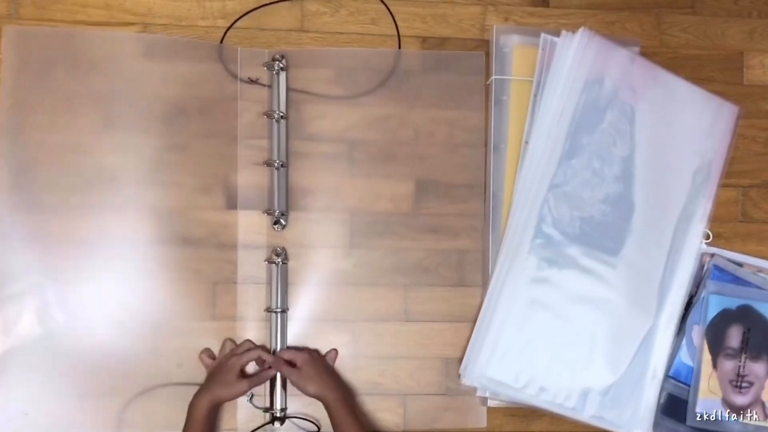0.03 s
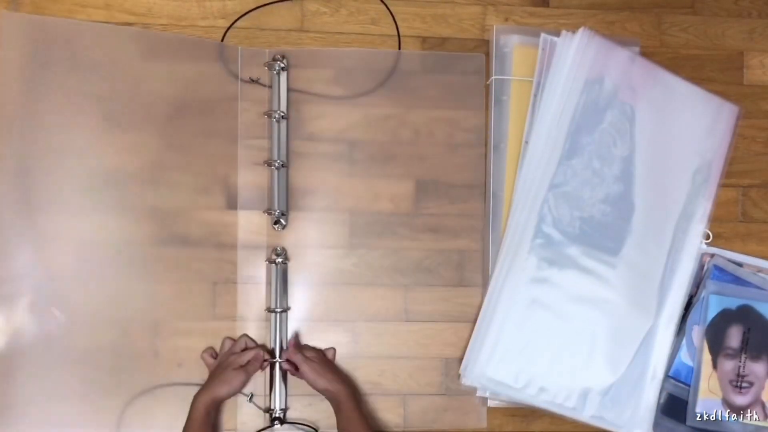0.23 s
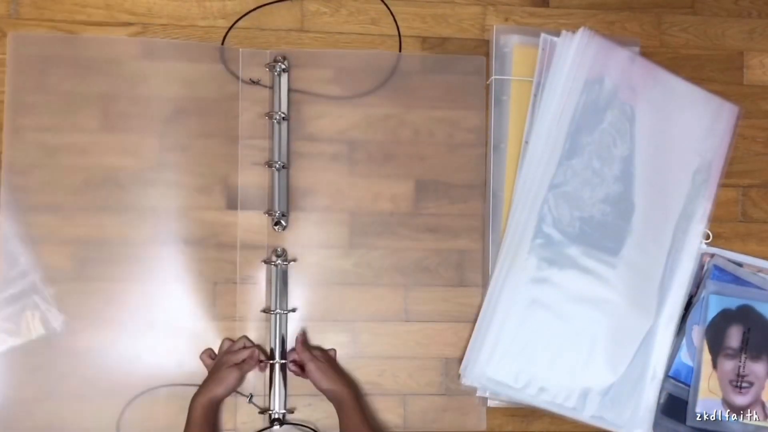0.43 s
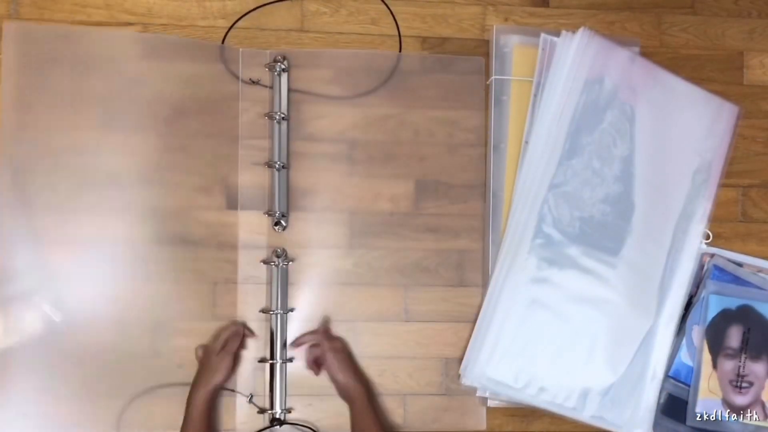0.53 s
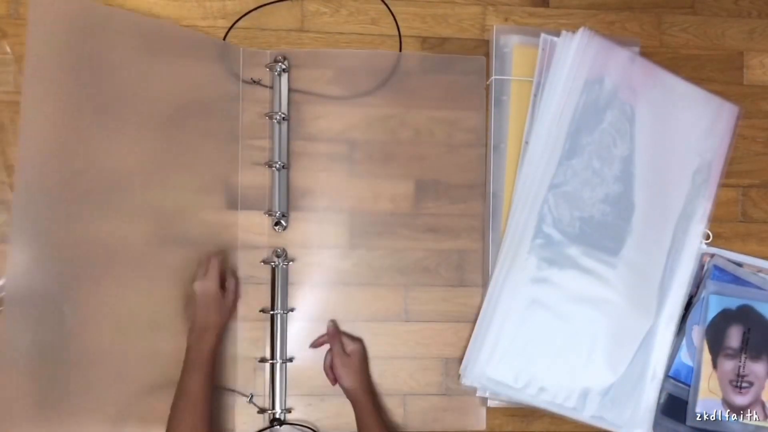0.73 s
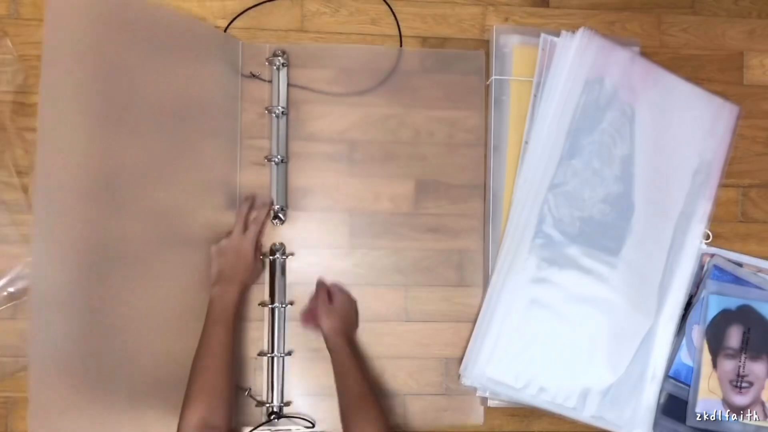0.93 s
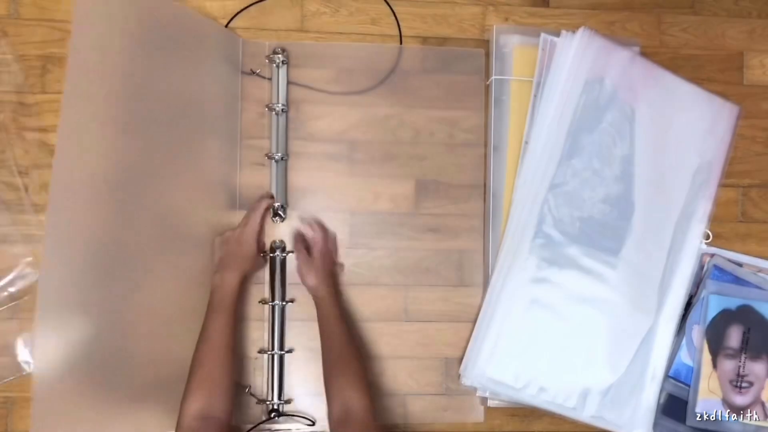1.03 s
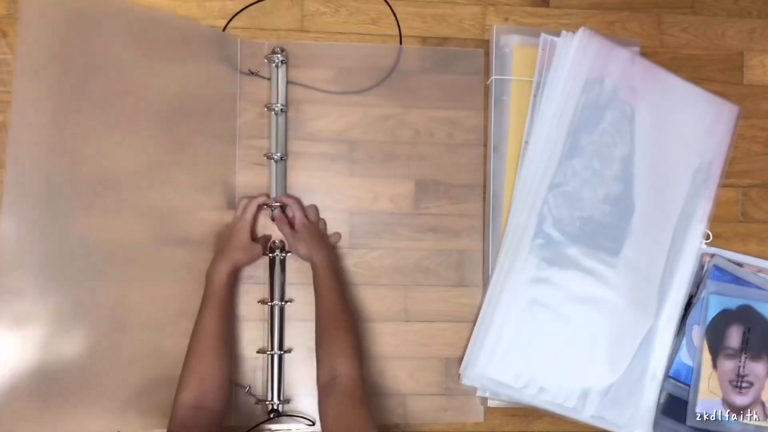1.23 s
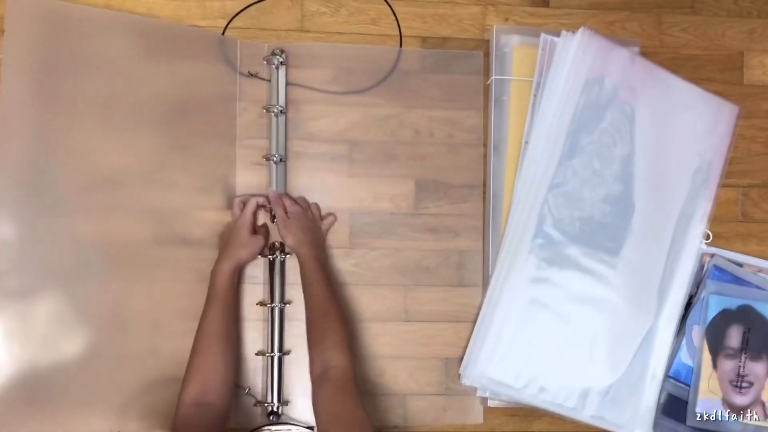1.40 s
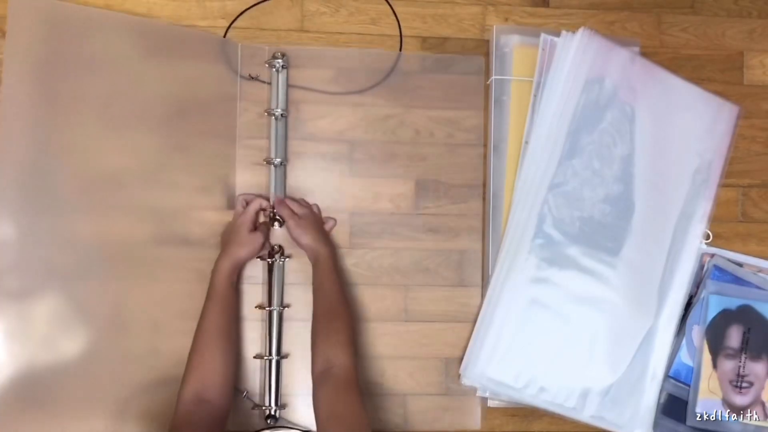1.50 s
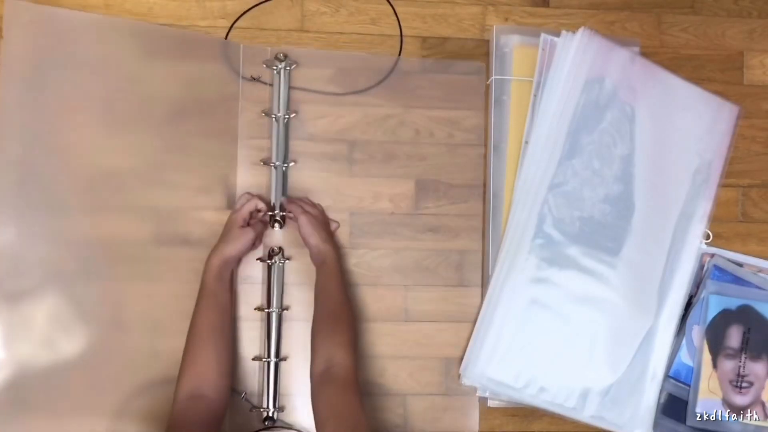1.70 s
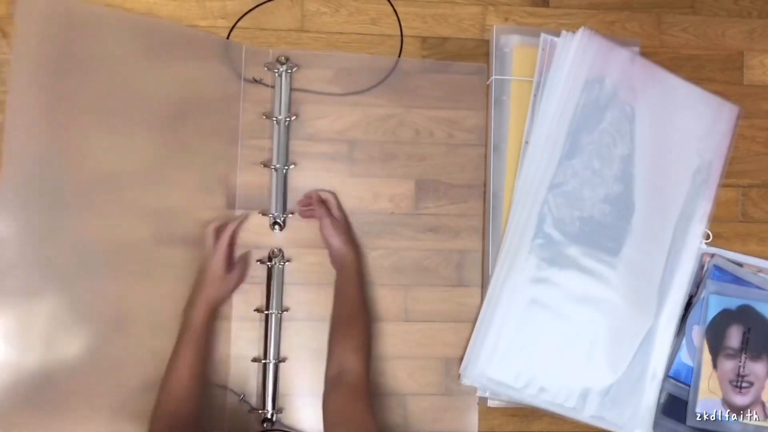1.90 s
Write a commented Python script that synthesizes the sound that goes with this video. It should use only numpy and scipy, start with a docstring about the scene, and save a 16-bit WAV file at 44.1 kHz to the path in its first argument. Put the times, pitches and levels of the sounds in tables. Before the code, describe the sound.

Metal binder rings snap open twice in a small, hard room with a low hush. After faint finger ticks, the first loud crack comes at about 0.2 seconds, with a brief rattle, ring and thump on wood. From 0.4 to 1.3 seconds, hands softly slide and knock on the plastic cover. The rings tick near 1.4 seconds, then a second, higher snap at 1.6 seconds precedes a faint slide.

```python
"""Two steel ring mechanisms of a plastic binder are pulled open on wood, in a small hard room.
Fingers tick, knock and scrape; at 0.23 s the lower sprung spine flips with a crack, chatters
and rings while the cover thumps on the wood. Hands then slide over the cover, knock on it and
make the closed rings tick. At 1.58 s the upper spine snaps, ringing higher; a faint slide follows.
The room throws it all back, over a low hush."""
import sys
import numpy as np
from scipy import signal
from scipy.fft import rfft, irfft, next_fast_len
from scipy.io import wavfile
from scipy.ndimage import uniform_filter1d

SR = 44100
rng = np.random.default_rng(int(sys.argv[2]) if len(sys.argv) > 2 else 0)


def dump_mix(stems):
    """Bounce the given channels to the path in sys.argv[1] as a 16-bit WAV at rate SR."""
    frames = np.atleast_2d(stems).T  # one column per channel
    limited = np.clip(frames, -1, 1)  # hard clip at full scale
    pcm = np.round(limited * 32767).astype(np.int16)
    wavfile.write(sys.argv[1], SR, pcm)


N = 85995
T = np.arange(N) / SR


def snap(start_s, lag_s, levels, spectrum, modes):
    """A sprung spine cracks over, chatters lag_s later and rings. Returns (direct, room send)."""
    # cover on wood: f/Hz, level/dB
    thump_spectrum = [(80, -41), (170, 7), (280, -12), (390, 2), (520, -5.5), (650, 7.5), (800, 13.5),
                      (1500, -29.5), (4000, -70)]
    crack_db, chatter_db, ring_db, thump_db, send_db = levels
    chatter_spread_s, thump_rise_s, ring_rise_s = 0.013, 0.015, 0.014
    t60_1khz_s, damping_exponent = 0.24, 0.05
    age_s = np.maximum(T - start_s, 0)
    crack = undb(crack_db) * fade(start_s, t60_s=0.054)
    plate_power = signal.fftconvolve(contacts(per_s=7000) ** 2, fade(0, t60_s=0.017) ** 2)[:N]
    swell = (T > start_s) * np.exp(-((age_s - lag_s) / chatter_spread_s) ** 2 / 2)
    chatter = undb(chatter_db) * unit(np.sqrt(np.abs(plate_power))) * swell
    thump = undb(thump_db) * (1 - np.exp(-age_s / thump_rise_s)) * fade(start_s, t60_s=0.099)
    impacts = colour(burst(np.hypot(crack, chatter)), spectrum) + colour(burst(thump), thump_spectrum)
    damped_modes = [(hz, db, t60_1khz_s * (hz / 1000) ** -damping_exponent) for hz, db in modes]
    ring = undb(ring_db) * (1 - np.exp(-age_s / ring_rise_s)) * ringing(start_s, damped_modes)
    return np.array([impacts + ring, undb(send_db) * impacts])


def lower_snap():
    """The lower mechanism opens with a firm thump."""
    # crack/dB, chatter/dB, ring/dB, thump/dB, room send/dB
    levels = (-11.5, -18, -16, -26, 0.5)
    # crack and chatter: f/Hz, level/dB
    spectrum = [(100, -36), (200, -33.5), (400, -9.5), (560, -11), (660, 1), (780, -5), (950, 2.5),
                (1130, -11), (1320, 2.5), (1600, -10), (2100, -3.5), (2900, -5.5), (3500, -1), (4100, -4.5),
                (6500, -4), (10000, -11.5), (16000, -9)]
    # spine with its rings: f/Hz, level/dB
    low_modes = [(699.8, -48), (861.3, -44), (1001, -39), (1308, -39), (1340, -43), (1453, -47),
                 (1610, -50), (1680, -45), (1916, -50), (1976, -46)]
    high_modes = [(3332, -43), (3967, -47), (4635, -46), (5356, -47), (5895, -46), (6358, -49), (7009, -47),
                  (8301, -45)]
    return snap(start_s=0.2329, lag_s=0.0285, levels=levels, spectrum=spectrum,
                modes=low_modes + high_modes)


def upper_snap():
    """The upper mechanism opens: higher ring, little thump."""
    # crack/dB, chatter/dB, ring/dB, thump/dB, room send/dB
    levels = (-14.5, -17.5, -19, -40.5, 0)
    # crack and chatter: f/Hz, level/dB
    spectrum = [(100, -30), (230, -16), (450, -16.5), (570, -2), (800, -12.5), (980, -4), (1170, -1.5),
                (1550, -9.5), (2050, -2.5), (3300, -1.5), (5600, -2), (7500, -7), (11000, -9.5),
                (16000, -9.5)]
    # spine with its rings: f/Hz, level/dB
    low_modes = [(546, -49), (1129, -62), (1220, -45), (1884, -46)]
    high_modes = [(2110, -46), (2412, -46), (2670, -46), (3230, -45), (3435, -44), (3736, -47), (3935, -48),
                  (4468, -45), (4527, -46), (4603, -46), (4910, -45), (5114, -48), (5496, -46)]
    return snap(start_s=1.5823, lag_s=0.026, levels=levels, spectrum=spectrum,
                modes=low_modes + high_modes)


def ticks(t60_s=0.042, ring_db=-2):
    """Closed rings tick, damped by the fingers, plus one ceiling echo: each a click and a thin ring."""
    # ticks; the 1.41 s row is the ceiling echo of the 1.39 s tick: t/s, level/dB, tilt/(dB/octave)
    events = [(0.061, -46, 3), (0.152, -57.5, 4), (0.459, -43.5, 2), (1.3912, -34, 0.5), (1.393, -37.5, -3),
              (1.41, -40, 1.5), (1.5147, -43.5, -1), (1.565, -54.5, 1)]
    # click: f/Hz, level/dB
    spectrum = [(200, -26), (400, -3), (650, -3), (1100, -19), (2000, 2.5), (3400, 4.5), (4200, -10.5),
                (5200, -0.5), (7800, -10.5), (9000, -17), (13000, -9.5), (16000, -23)]
    # closed ring: f/Hz, level/dB, t60/s
    modes = [(2080, -15, .04), (2525, -15, .04), (3320, -2, .04), (3470, 0, .04), (5125, -9, .05),
             (5750, -12, .05), (7526, -12, .04), (7983, -13, .05), (10400, -16, .04), (13100, -14, .04)]
    out = 0
    for start_s, db, tilt in events:
        click = colour(noise() * fade(start_s, t60_s), spectrum, tilt)
        ring = undb(ring_db - 2 * tilt) * ringing(start_s, modes)  # brighter ticks ring less
        out += undb(db) * (click + ring)
    return out


def knocks(rise_s=0.0015, t60_s=0.049, hollow_db=-2.5):
    """Soft fingertips knock the cover against the wood: dull, hollow."""
    # taps: t/s, level/dB, tilt/(dB/octave)
    taps = [(0.104, -45, 0.5), (0.119, -43, -3), (0.148, -56, -3), (0.401, -42, 4.5), (0.732, -41, 1),
            (0.743, -41, -1), (0.8307, -38.5, 2), (0.872, -45, -5.5), (1.007, -42.5, 0.5),
            (1.037, -50, 3.5)]
    # thud: f/Hz, level/dB
    spectrum = [(100, -21.5), (350, -12), (580, 0), (800, -13.5), (1500, -12), (2300, -19), (4000, -21.5),
                (8000, -29.5), (16000, -41)]
    # cover: f/Hz, level/dB, t60/s
    modes = [(595, 0, .045), (730, -9, .04), (900, -10, .04)]
    out = 0
    for start_s, db, tilt in taps:
        thud = colour(noise() * fade(start_s, t60_s), spectrum, tilt)
        hollow = undb(hollow_db) * ringing(start_s, modes)
        out += undb(db) * np.clip((T - start_s) / rise_s, 0, 1) * (thud + hollow)
    return out


def scrapes():
    """Fingers stick and slip on the steel."""
    # strokes: t/s, length/s, level/dB, tilt/(dB/octave)
    strokes = [(0.082, 0.017, -54, 0), (0.215, 0.06, -45, 2), (0.73, 0.014, -43, -3.5),
               (1.076, 0.019, -48.5, 3.5), (1.101, 0.042, -46, -0.5), (1.236, 0.024, -52, 2.5),
               (1.283, 0.034, -47, 4), (1.571, 0.015, -30.5, 8)]
    # skin on steel: f/Hz, level/dB
    spectrum = [(200, -9), (700, 1.5), (1900, 2), (3500, -2), (5000, -10.5), (9000, -23.5), (16000, -27.5)]
    return sum(undb(db) * colour(rub(start_s, length_s), spectrum, tilt)
               for start_s, length_s, db, tilt in strokes)


def rustles():
    """The plastic cover rustles as it bends."""
    # bends: t/s, length/s, level/dB
    bends = [(0.162, .012, -48), (0.221, 0.019, -52), (0.748, 0.02, -49.5)]
    # bending plastic: f/Hz, level/dB
    spectrum = [(1000, -28), (3000, -18), (5000, 4.5), (6500, -3), (8500, 5), (11000, 0.5), (16000, -10)]
    return sum(undb(db) * colour(rub(start_s, length_s), spectrum) for start_s, length_s, db in bends)


def slide():
    """Hands slide over the cover: fine-grained friction."""
    # friction envelope: t/s, level/dB
    envelope = [(0, -62.5), (.36, -77), (.47, -49), (.55, -56), (.62, -49), (.71, -57.5), (.77, -55.5),
                (.81, -58), (.9, -56.5), (.97, -74), (1.12, -60), (1.33, -73.5), (1.48, -79), (1.8, -59.5),
                (1.88, -55.5), (1.95, -56)]
    # skin on plastic: f/Hz, level/dB
    spectrum = [(180, -37.5), (300, -3.5), (372, -16.5), (593, 0), (787, -7), (1030, -2.5), (2520, -4),
                (9390, -8), (16000, -15)]
    times_s, db = np.array(envelope).T
    return colour(contacts(per_s=8000) * undb(np.interp(T, times_s, db)), spectrum)


def room(x, tail_db=-4.5, build_s=0.004, ceiling_db=-12, ceiling_s=0.0185):
    """A scattered ceiling echo and a short diffuse tail whose treble dies first."""
    # room decay: f/Hz, t60/s
    decay = [(200, 0.29), (1000, 0.33), (3500, 0.3), (8000, 0.26), (15000, 0.23)]
    hz, t60s_s = np.array(decay).T
    bins_hz = np.fft.rfftfreq(N, 1 / SR)
    field = rfft(noise())
    bands = [irfft(field * np.interp(bins_hz, hz, weights), N) for weights in np.eye(len(hz))]
    tail = sum(band * fade(0, t60_s) for band, t60_s in zip(bands, t60s_s))
    tail *= 1 - np.exp(-T / build_s)
    echo = burst(fade(ceiling_s, t60_s=0.09))
    response = undb(tail_db) * tail / np.linalg.norm(tail) + undb(ceiling_db) * echo / np.linalg.norm(echo)
    return signal.fftconvolve(x, response)[:N]


def hush(level_db=-56):
    """Steady low room noise."""
    # hush: f/Hz, level/dB
    spectrum = [(20, -28), (40, -38), (62, 0), (100, -4), (165, 6.5), (200, 1.5), (240, 5.5), (340, -2),
                (750, -8), (2000, -12.5), (4500, -18), (9000, -23.5), (16000, -48)]
    return undb(level_db) * colour(noise(), spectrum)


def rub(start_s, length_s, attack_s=0.005):
    """A short run of stick and slip."""
    attack = np.clip((T - start_s) / attack_s, 0, 1)
    return contacts(per_s=9000) * attack * np.exp(-((T - start_s) / length_s) ** 2)


def contacts(per_s):
    """Tiny random impacts, rms 1."""
    return unit((rng.random(N) < per_s / SR) * noise())


def ringing(start_s, modes):
    """Decaying sines from rows of f/Hz, level/dB, t60/s; initial rms 1."""
    out = sum(undb(db) * fade(start_s, t60_s) * np.sin(2 * np.pi * (hz * T + rng.random()))
              for hz, db, t60_s in modes)
    return out / np.sqrt(sum(undb(db) ** 2 for _, db, _ in modes) / 2)


def burst(envelope, passes=3, window_samples=200):
    """Enveloped noise, its chance resonances evened out."""
    x = noise() * envelope
    for _ in range(passes):
        spectrum = rfft(x)
        white = unit(irfft(spectrum / (np.abs(spectrum) + 1e-12), N))
        local_power = np.abs(uniform_filter1d(white ** 2, window_samples))
        x = envelope * white / np.sqrt(local_power + 1e-12)
    return x


def colour(x, points, tilt_db_per_octave=0):
    """Minimum-phase filter of unit power through points of f/Hz, level/dB."""
    size = 2 * next_fast_len(N)
    octave = np.log2(np.maximum(np.fft.rfftfreq(size, 1 / SR), 1))
    hz, db = np.array(points).T
    tilt_db = tilt_db_per_octave * np.clip(octave, np.log2(hz[0]), np.log2(hz[-1]))
    gain = unit(undb(np.interp(octave, np.log2(hz), db) + tilt_db))
    cepstrum = irfft(np.log(gain + 1e-9))
    cepstrum[1:size // 2] *= 2
    cepstrum[size // 2 + 1:] = 0
    return irfft(rfft(x, size) * np.exp(rfft(cepstrum)))[:N]


def fade(start_s, t60_s):
    """Silence, then exponential decay from 1."""
    return (T >= start_s) * np.exp(-np.log(1000) * np.maximum(T - start_s, 0) / t60_s)


def noise():
    """White noise."""
    return rng.standard_normal(N)


def unit(x):
    """Scale to rms 1."""
    return x / np.sqrt(np.mean(x ** 2) + 1e-20)


def undb(db):
    """Decibels to gain."""
    return 10 ** (np.asarray(db) / 20)


def scene():
    """Snaps and handling in the room, over its hush."""
    snaps, room_send = lower_snap() + upper_snap()
    handling = ticks() + knocks() + scrapes() + rustles() + slide()
    return (snaps + handling + room(room_send + handling) + hush())[None]


def record(dry, cutoff_hz=16000):
    """Soft clip, then steep low-pass."""
    low_pass = signal.ellip(10, .2, 80, cutoff_hz, fs=SR, output="sos")
    return signal.sosfilt(low_pass, np.tanh(dry))


dry = scene()
out = record(dry)
dump_mix(out)
```